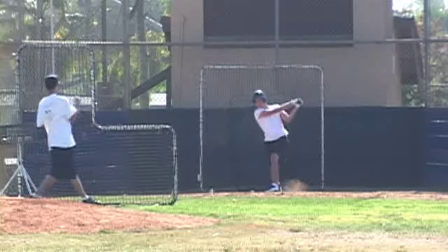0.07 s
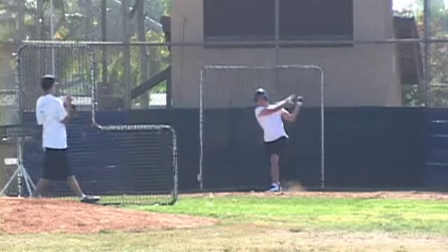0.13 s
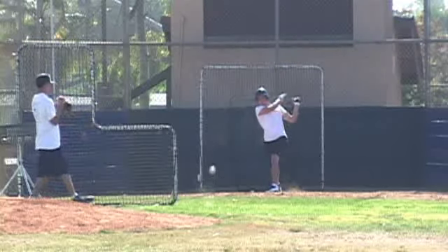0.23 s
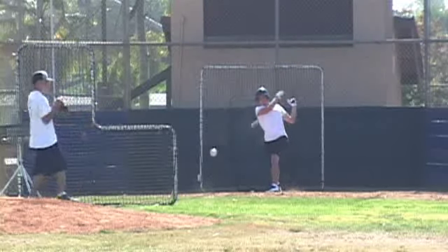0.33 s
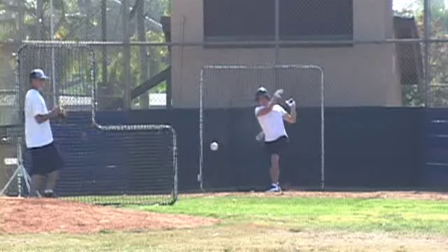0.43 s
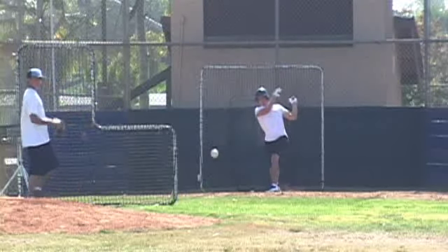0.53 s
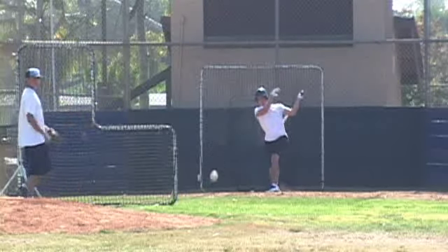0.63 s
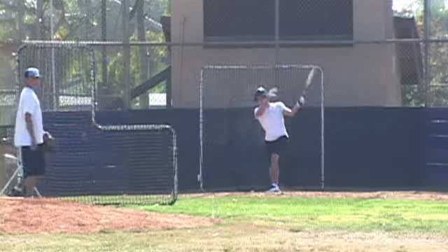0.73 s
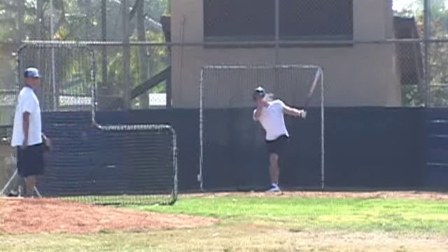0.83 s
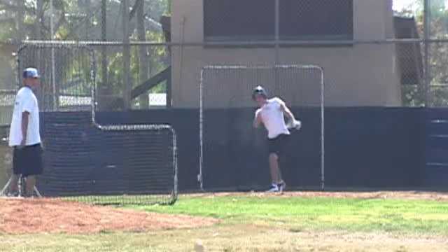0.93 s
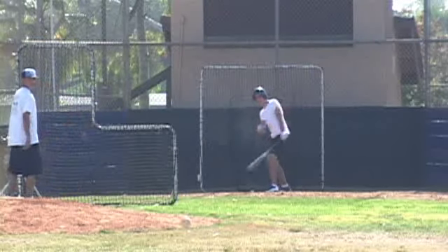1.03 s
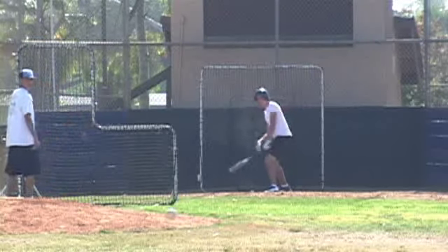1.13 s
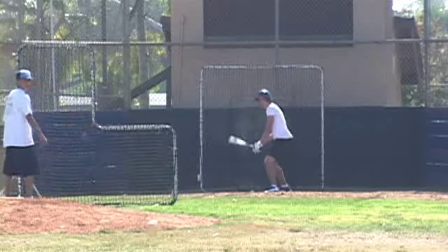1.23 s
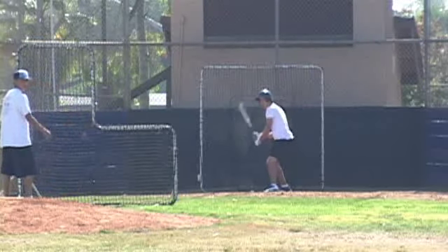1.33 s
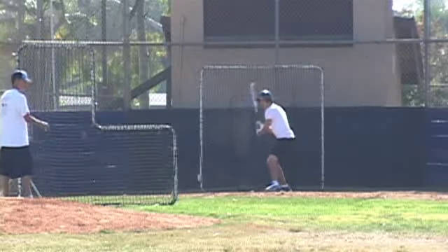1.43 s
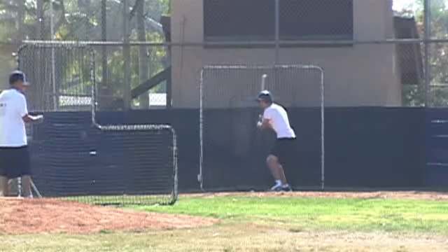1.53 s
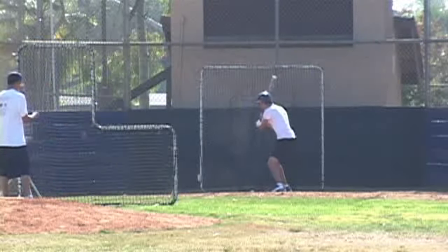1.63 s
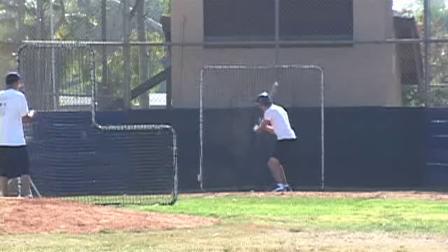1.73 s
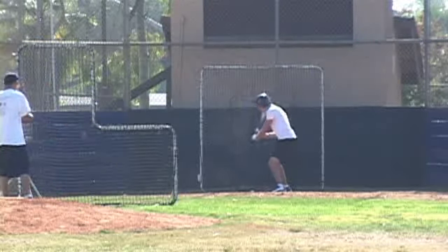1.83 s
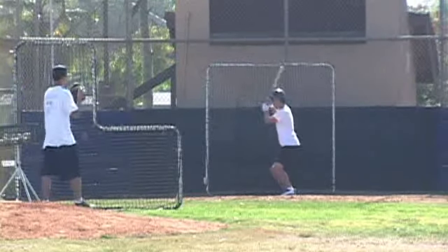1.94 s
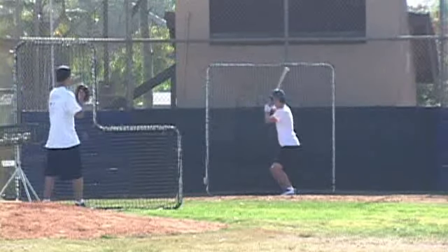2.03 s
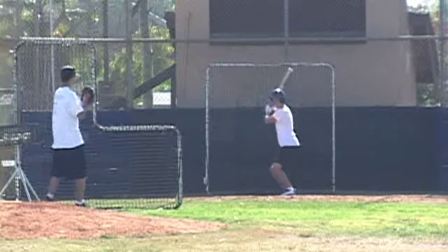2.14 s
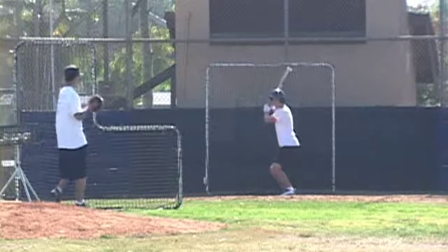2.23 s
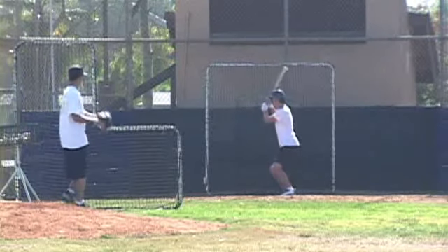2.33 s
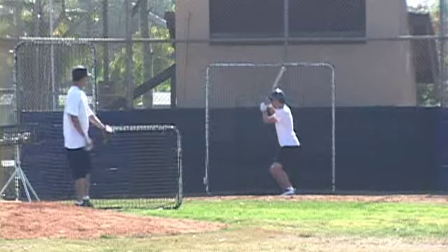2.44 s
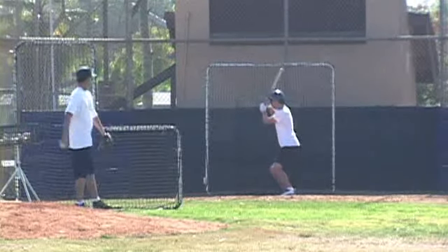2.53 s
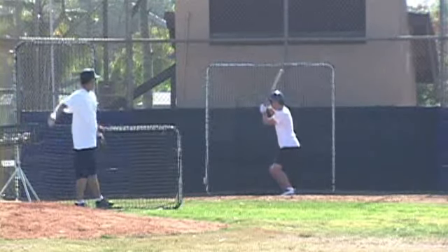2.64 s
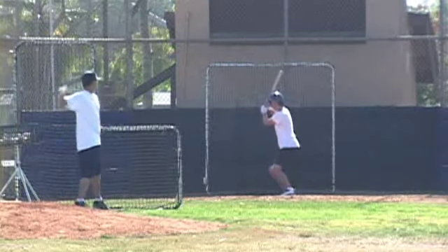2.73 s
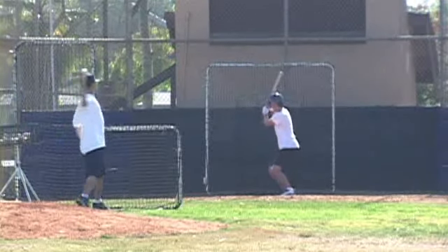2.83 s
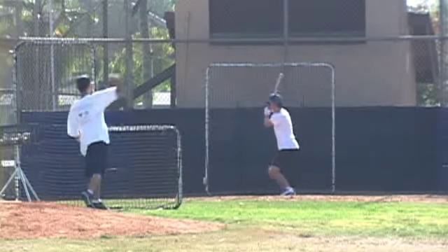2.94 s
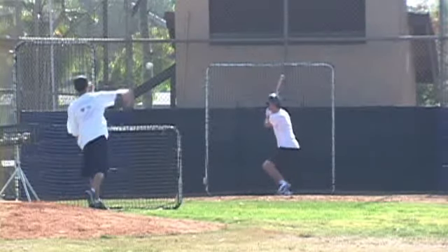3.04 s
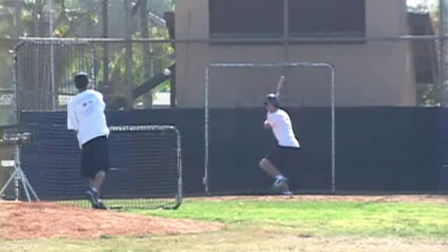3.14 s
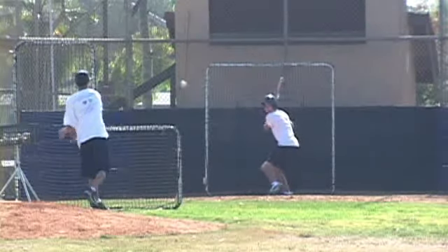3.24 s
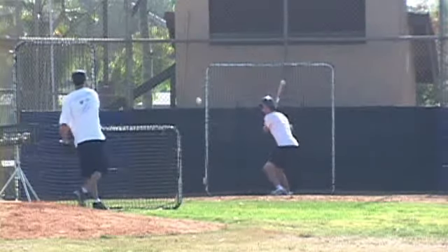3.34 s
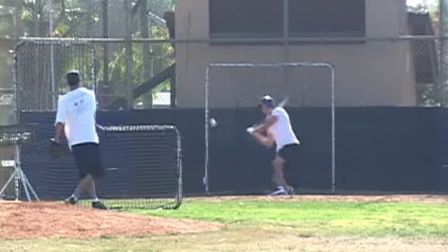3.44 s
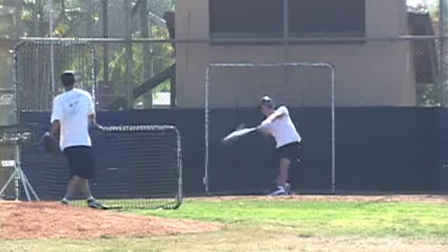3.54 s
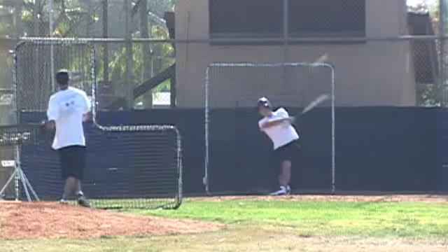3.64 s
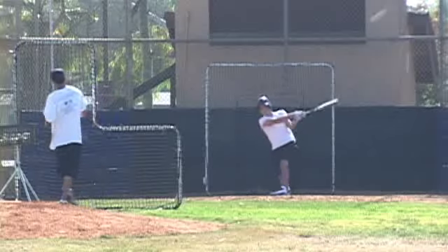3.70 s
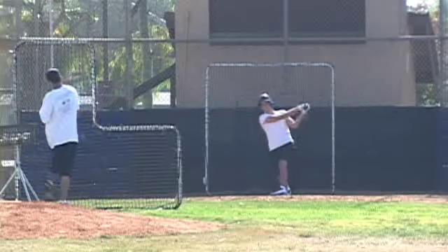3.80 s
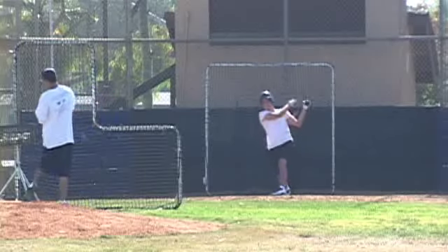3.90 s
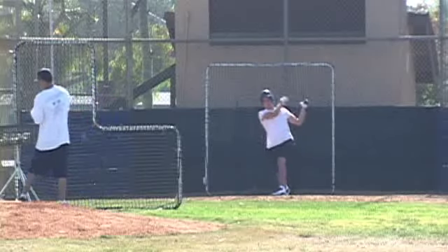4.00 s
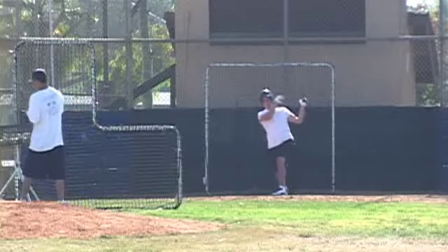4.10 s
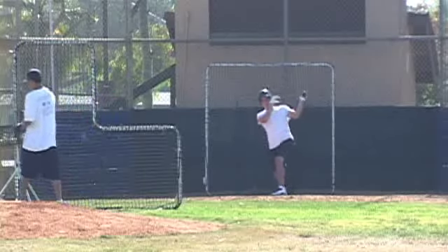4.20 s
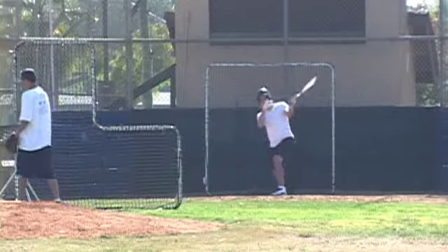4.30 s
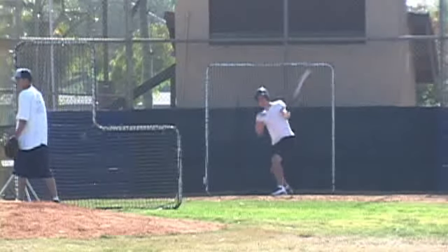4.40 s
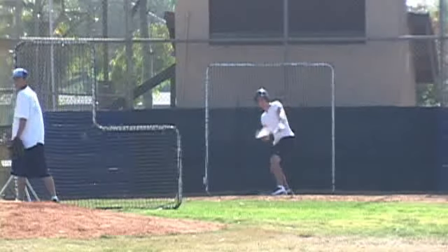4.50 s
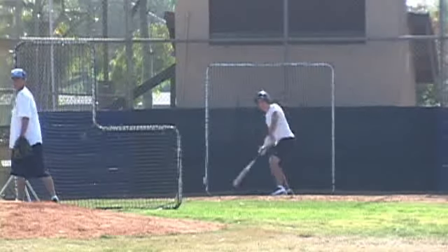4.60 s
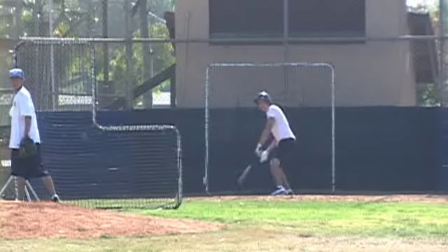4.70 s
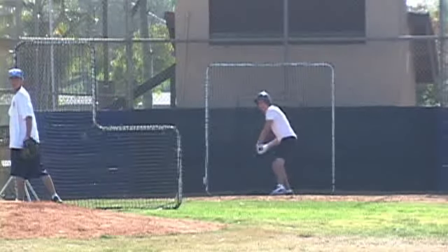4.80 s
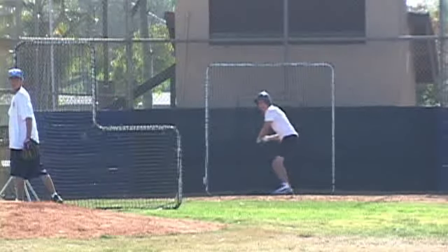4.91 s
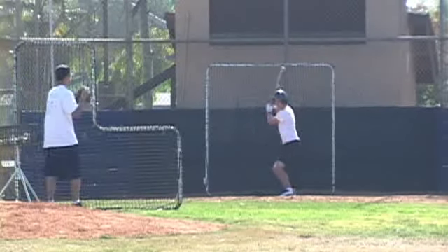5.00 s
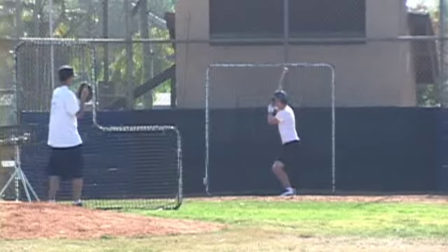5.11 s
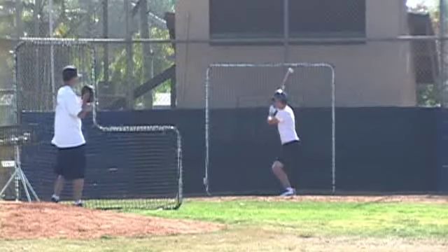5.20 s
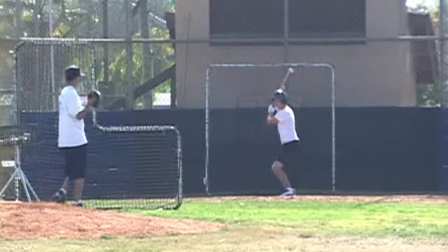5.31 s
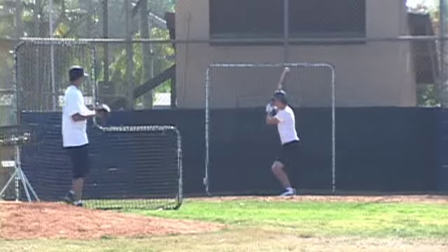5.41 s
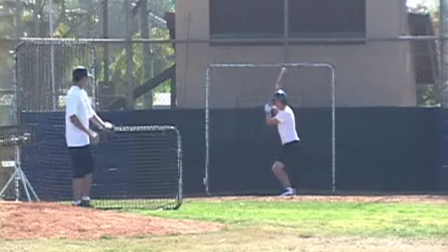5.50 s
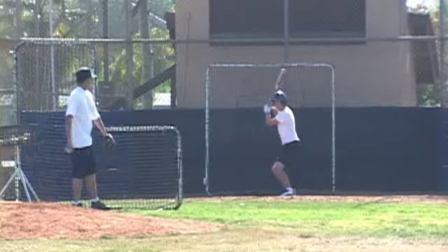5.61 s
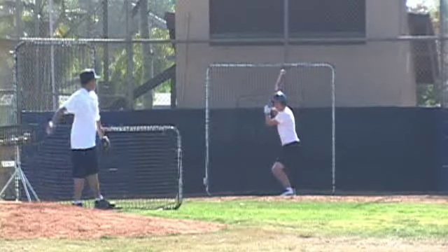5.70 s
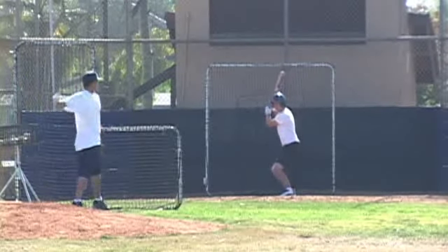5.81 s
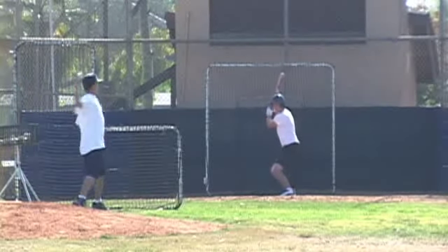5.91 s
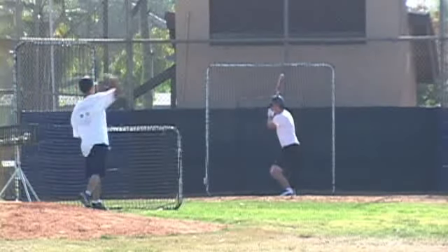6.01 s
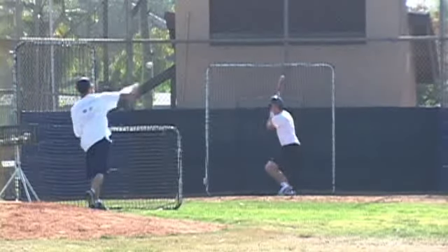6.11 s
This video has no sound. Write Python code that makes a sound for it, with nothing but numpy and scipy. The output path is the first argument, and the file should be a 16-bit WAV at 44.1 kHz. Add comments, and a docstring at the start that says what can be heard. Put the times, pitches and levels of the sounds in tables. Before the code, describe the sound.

A hollow metal bat pings hard twice at an open practice field, each ring swelling and bending, with a soft glove pop between.

```python
"""A sharp crack of a metal bat on a ball is heard first, and another later; each ring swells, bends and lingers.
Each blow is a noise burst with damped sines; the turning barrel adds gliding beams, long modes and a smeared band.
A wall and the field return delayed, coloured noise and ring. Between the hits a soft step and a ball in a glove
sound as damped modes. Faint birds are gliding sines with haze; a brief far tone is a wavering sine. Wind rumble,
far traffic and leaves are coloured noise over a sine hum; the low noise and hiss step up, sag and step back down."""
import sys
import numpy as np
from scipy import signal
from scipy.fft import irfft
from scipy.io import wavfile

SR = 44100
rng = np.random.default_rng(int(sys.argv[2]) if len(sys.argv) > 2 else 0)


def digitize_waveform(pressure):
    """Quantize a signal to 16-bit integers and store it at the path in sys.argv[1].

    Rows of a 2-D input are taken as channels; values are limited to [-1, 1].
    """
    field = np.atleast_2d(pressure).T
    bounded = np.clip(field, -1, 1)
    quanta = np.round(bounded * 32767).astype(np.int16)
    wavfile.write(sys.argv[1], SR, quanta)


N = 271215
TIME = np.arange(N) / SR   # s

# Bat meets ball: [t/s, crack level/dB, time until the barrel has turned away/s, time until it faces forward/s,
#   ping f/Hz, beam level/dB, lasting ring level/dB, ring tilt/(dB per octave), wall delay/s, wall level/dB]
HITS = [(0.0755, 6.5, 0.026, 0.13, 2076, -1.7, -4.5, 0, .0425, 1),
        (3.7822, 8, 0.026, 0.14, 2058, -3, -2.5, 0, .0452, -11)]
# Ping sent forward at contact, f as in the first hit: [f/Hz, first-hit level/dB, second-hit level/dB, t60/s]
PING = [(453, -12, -16, 0.016), (1026, -4.5, -23, 0.0084), (1300, -6, -43, 0.014), (2076, -2.5, -8, 0.6),
        (2570, -13, -6.5, 0.082), (3140, -0.5, -0.5, 0.014), (3630, -37, -6, 0.022),
        (4130, -20.5, -21, 0.11), (4460, -20.5, -13.5, 0.03), (5454, -17, -17.5, 0.088),
        (5915, -18.5, -24.5, 0.1), (6250, -29, -35, 0.046), (7050, -26, -25.5, 0.11)]
# Beams of the barrel modes; two equal beams lie offset before and after facing, and coincide at offset 0:
#   [f/Hz, level/dB, glide/(Hz/s), offset/swing time, half-width/swing time]
BEAMS = [(1915, -4.5, 61.5, 0.037, 0.18), (2093, -14, -330, 0.28, 0.16), (4170, -41.5, -600, 0.18, 0.26),
         (5000, -49, 3.5, 0, .22), (5430, -45, 1.5, .27, .09)]
# Weaker beam ahead of the first mode's beam: [centre/swing time, half-width/swing time, level/dB]
SIDE_BEAM = (0.44, 0.6, -15.5)
# Lasting modes of the hollow barrel: [f/Hz, level/dB, t60/s]
BARREL_MODES = [(1886, -27, 1.87), (1995, -24.5, 1.8), (2097, -24.5, 1.82), (2380, -35.5, 1),
                (3800, -41.5, 0.84), (4200, -41.5, 0.74), (4910, -36, 0.96), (5470, -41, 0.58),
                (5950, -41.5, 0.32)]
# Two main modes smeared into one band by the bat's motion: [f/Hz, level/dB]
SMEAR_COLOUR = [(1790, -51.5), (1855, -16.5), (1897, 4.5), (1950, -10.5), (2020, 0), (2080, 7.5),
                (2130, -20), (2190, -44.5)]
# Swells of the lingering ring: [t after the hit/s, half-width/s, level/dB]
RING_SWELLS = [(.24, .06, 9.5), (0.562, .07, 9.5), (.72, .06, 8), (.855, 0.025, 12)]
# Colour of the crack: [f/Hz, level/dB]
CRACK_COLOUR = [(150, -7), (300, -14), (700, -30), (1400, -10.5), (2300, 14), (3200, -2), (4500, -2.5),
                (6000, -19), (7500, -18.5)]
# Colour of the slap returned by the wall: [f/Hz, level/dB]
WALL_COLOUR = [(150, -23), (300, 4.5), (800, -4.5), (1400, -2), (1780, 12), (2300, -5.5), (3200, 2),
               (4200, -8.5), (5500, -15.5), (7500, -27.5)]
# Ring sent backward to the wall: [f/Hz, level/dB, t60/s]
BACK_RING = [(946, -10, 0.017), (1797, 3.5, 0.018), (1870, -7.5, 0.14), (2410, -18, 0.093),
             (2996, -6, 0.025), (5000, -23, .06), (5540, -24.5, 0.055)]
# Colour of scatter from fences and trees: [f/Hz, level/dB]
SCATTER_COLOUR = [(150, -10), (400, -17.5), (1200, 2), (2200, 1), (3000, 4), (4300, -7.5), (5800, -4),
                  (7500, -21)]
# Farther echoes of the crack: [delay/s, half-width/s, level/dB, low f/Hz, high f/Hz]
ECHOES = [(0.103, 0.0045, -30.5, 2810, 5930), (0.297, .003, -29, 4960, 7400)]
# Ball into leather: [t/s, level/dB]
CATCHES = [(1.6726, -18)]
# Modes of the glove: [f/Hz, level/dB, t60/s]
GLOVE_MODES = [(378, -15, 0.045), (627, 1.5, 0.013), (1490, 2, 0.0031), (2060, -12.5, 0.0082),
               (2470, -17, 0.021), (6120, -16, 0.0023)]
# Soft footfalls on dirt: [t/s, level/dB, f/Hz, t60/s]
STEPS = [(1.016, -27.5, 288, 0.038)]
# Bird chirps: [t/s, half-width/s, f/Hz, glide/(Hz/s), level/dB]
CHIRPS = [(2.507, 0.0055, 5700, -1, -55), (2.81, 0.012, 4200, 4, -45), (3.2, 0.0095, 5900, 0, -59),
          (4.975, 0.012, 6100, -20000, -60), (5.783, 0.0092, 5200, 14996, -52),
          (5.781, 0.0065, 6400, -4, -59), (5.935, .018, 3600, 14999, -56)]
# Colour of the low noise that steps up for a while: [f/Hz, level/dB]
RAISED_COLOUR = [(55, -7), (80, 0), (120, 2), (165, -7.5), (220, -15), (300, -23)]
# Colour of the wind rumble: [f/Hz, level/dB]
RUMBLE_COLOUR = [(12, -61), (20, -29), (32, -10.5), (54, 0), (108, -0.5), (130, -3), (242, -16.5),
                 (300, -29.5), (390, -52), (660, -120)]
# One gust lifting the rumble: [t/s, half-width/s, level/dB]
GUST = (3.87, 0.67, 4.1)
# Colour of far traffic: [f/Hz, level/dB]
TRAFFIC_COLOUR = [(130, -23.5), (220, -5), (403, -5.5), (527, -7.5), (570, -7.5), (798, -6), (1130, -9),
                  (1340, -13.5), (2240, -18.5), (3200, -31.5), (4160, -59.5), (7040, -120)]
# Colour of leaves: [f/Hz, level/dB]
LEAVES_COLOUR = [(1500, -21.5), (2600, 2), (4000, -0.5), (6000, -4.5), (7500, -9)]

SMEAR_DB, SMEAR_T60_S, SMEAR_BUILD_S = -32, 1.72, 0.04
RAISED_ON_S, RAISED_OFF_S, RAISED_EDGE_S = 1.95, 5.1, 0.02
RAISED_DB, RAISED_SAG_DB_PER_S, RAISED_HISS_DB = -32, 0.5, -64
RUMBLE_DB, TRAFFIC_DB, LEAVES_DB = -36.5, -44, -62.5
RUMBLE_FALL_DB_PER_S = 0.06   # the wind slowly eases
CUTOFF_HZ = 7500


def from_db(db):
    """Level to amplitude: 20 dB is a factor of ten."""
    return 10 ** (np.asarray(db) / 20)


def rms_one(x):
    """Normalisation: scale to unit rms."""
    return x / np.sqrt(np.mean(x ** 2) + 1e-20)


def noise(spectrum, size=N):
    """Random-phase synthesis: a fixed magnitude spectrum gives coloured noise of unit rms."""
    hz, db = np.transpose(spectrum)
    octave = np.log2(np.maximum(np.fft.rfftfreq(size, 1 / SR), 1))
    outside = np.abs(octave - np.clip(octave, np.log2(hz[0]), np.log2(hz[-1])))
    # 22 dB per octave is taken off beyond the ends of the table
    gain = from_db(np.interp(octave, np.log2(hz), db) - 22 * outside)
    phase = 2 * np.pi * rng.random(len(gain))
    return rms_one(irfft(gain * np.exp(1j * phase), size))


def drift(rate):
    """Low-passed chance: two equal poles smooth white noise into a wander of unit rms."""
    step = 100   # samples between drawn values
    pole = np.exp(-2 * np.pi * rate * step / SR)
    white = rng.standard_normal(N // step + 1002)
    slow = signal.lfilter([1], [1, -2 * pole, pole * pole], white)[1000:]   # drop the filter's start
    return np.interp(np.arange(N) / step, np.arange(len(slow)), rms_one(slow))


def decay(start, t60):
    """Exponential damping: a sudden start, then 60 dB lost in each t60."""
    return (TIME >= start) * from_db(-60 * np.clip((TIME - start) / t60, 0, 4))


def mode(start, hz, t60):
    """Free vibration of a struck mode: a damped sine."""
    return decay(start, t60) * np.sin(2 * np.pi * hz * (TIME - start))


def swell(centre, width):
    """Gaussian envelope: a smooth rise and fall, 1/e high at one half-width."""
    return np.exp(-np.minimum(((TIME - centre) / width) ** 2, 20))


def band(x, low_hz, high_hz):
    """Causal band-pass filtering."""
    return signal.sosfilt(signal.butter(2, [low_hz, high_hz], "band", fs=SR, output="sos"), x)


def contact(crack_db=-4, crack_t60=0.0079):
    """Impact excitation: a broad crack and a loud modal ping that fades as the barrel turns away."""
    crack = noise(CRACK_COLOUR)
    out = np.zeros(N)
    for k, (s, db, turn_s, _, pitch_hz, *_) in enumerate(HITS):
        ratio = pitch_hz / HITS[0][4]
        ping = np.zeros(N)
        for hz, *levels_db, t60 in PING:
            ping += from_db(levels_db[k]) * mode(s, hz * ratio, t60)
        out += from_db(crack_db + db) * crack * decay(s, crack_t60)
        out -= ping * swell(s, turn_s)
    return out


def sweeping_beams(octave_db=-26):
    """Directivity of a turning radiator: beams sweep past, later and wider in a slower swing."""
    side_at, side_width, side_db = SIDE_BEAM
    out = np.zeros(N)
    for s, _, _, swing_s, pitch_hz, beam_db, *_ in HITS:
        facing = s + swing_s
        since_facing = TIME - facing
        for k, (hz, db, glide, offset, width) in enumerate(BEAMS):
            early = swell(facing - offset * swing_s, width * swing_s)
            late = swell(facing + offset * swing_s, width * swing_s)
            beam = np.maximum(early, late)
            if k == 0:
                beam = beam + from_db(side_db) * swell(s + side_at * swing_s, side_width * swing_s)
            else:
                hz = hz * pitch_hz / HITS[0][4]   # the upper modes follow the pitch of the ping
            level = from_db(db + beam_db) * beam * (TIME >= s)
            phase = 2 * np.pi * (hz + glide * since_facing / 2) * since_facing
            out += level * np.sin(phase)
            # a faint octave grows as the square of the beam
            out += from_db(octave_db) * level ** 2 * np.sin(2 * phase)
    return out


def barrel_ring(slowing_s=0.822, build_s=0.008, count=4):
    """Doppler effect over several paths: each path bends and flutters the lasting modes in its own way."""
    doppler, flutter_db = 0.014, 3.2   # rms relative shift at the blow; rms flutter
    out = np.zeros(N)
    for s, *_, ring_db, tilt_db, _, _ in HITS:
        live = (TIME >= s) & (TIME < s + 2)
        age = TIME[live] - s
        for path in range(count):
            # the shift shrinks as the bat slows
            shift = doppler * np.exp(-age / slowing_s) * drift(3.85)[live]
            clock = age + np.cumsum(shift) / SR
            strength = from_db(ring_db + flutter_db * drift(13)[live]) * (1 - np.exp(-age / build_s))
            for hz, db, t60 in BARREL_MODES:
                tilted_db = db + tilt_db * np.log2(hz / BARREL_MODES[0][0])
                level = strength * from_db(tilted_db) * np.exp(-np.log(1000) * age / t60)
                out[live] += level * np.sin(2 * np.pi * (hz * clock + rng.random()))
    return out / np.sqrt(count)


def lingering_ring():
    """Scattering among the fences: a smeared band of ring builds, then dies away in slow swells."""
    out = np.zeros(N)
    for s, _, _, swing_s, _, _, ring_db, *_ in HITS:
        facing = s + swing_s
        build = 1 - np.exp(-np.maximum(TIME - facing, 0) / SMEAR_BUILD_S)
        swell_db = sum(db * swell(s + age, width) for age, width, db in RING_SWELLS)
        out += from_db(SMEAR_DB + ring_db + swell_db) * build * decay(facing, SMEAR_T60_S)
    return out * noise(SMEAR_COLOUR)


def wall_echo(slap_db=-11, smear_t60=0.045):
    """Reflection from the building behind: a slap smeared by its ledges, with the backward ring."""
    soften_s = 0.0018
    slap = noise(WALL_COLOUR)
    out = np.zeros(N)
    for s, *_, delay, echo_db in HITS:
        arrival = s + delay
        onset = 1 - np.exp(-np.maximum(TIME - arrival, 0) / soften_s)
        ring = sum(from_db(db) * mode(arrival, hz, t60) for hz, db, t60 in BACK_RING)
        smeared_slap = from_db(slap_db) * slap * decay(arrival, smear_t60)
        out += from_db(echo_db) * onset * (ring + smeared_slap)
    return out


def field(scatter_db=-31, scatter_t60=0.76):
    """Diffuse scattering: an uneven tail that takes a moment to build, with distinct far echoes."""
    uneven_db, build_t60 = 2.2, 0.06   # dB rms; s
    tail = sum(decay(s, scatter_t60) - decay(s, build_t60) for s, *_ in HITS)
    out = from_db(scatter_db + uneven_db * drift(130)) * noise(SCATTER_COLOUR) * tail
    crack = noise(CRACK_COLOUR)
    for delay, width, db, low_hz, high_hz in ECHOES:
        arrivals = sum(swell(s + delay, width) for s, *_ in HITS)
        out += from_db(db) * band(crack, low_hz, high_hz) * arrivals
    return out


def glove():
    """Heavy damping: a dry leather slap of a few short modes."""
    out = np.zeros(N)
    for s, db in CATCHES:
        for hz, mode_db, t60 in GLOVE_MODES:
            out -= from_db(db + mode_db) * mode(s, hz, t60)
    return out


def steps():
    """Damped impact: a shoe lands with a dull single-mode thud."""
    return sum(from_db(db) * mode(s, hz, t60) for s, db, hz, t60 in STEPS)


def birds(scatter_db=-11, scatter_t60=0.18, scatter_share=0.13):
    """Frequency and amplitude modulation: raspy gliding chirps, each with a haze scattered by the trees."""
    out = np.zeros(N)
    rasp = 0.7 + 0.7 * drift(900)
    white = rng.standard_normal(N)
    for s, width, hz, glide, db in CHIRPS:
        pitch = hz + glide * np.clip(TIME - s, -2 * width, 2 * width)
        out += from_db(db) * swell(s, width) * rasp * np.sin(2 * np.pi * np.cumsum(pitch) / SR)
        haze = rms_one(band(white, hz * (1 - scatter_share), hz * (1 + scatter_share)))
        out += from_db(db + scatter_db) * haze * decay(s - width / 2, scatter_t60)
    return out


def far_tone():
    """Slight frequency modulation: a faint, nearly steady tone surfaces briefly in the distance."""
    centre_s, width_s, hz, db = 2.13, 0.17, 529, -49
    pitch = hz + 3 * drift(5.0)
    return from_db(db) * swell(centre_s, width_s) * np.sin(2 * np.pi * np.cumsum(pitch) / SR)


def raised_noise():
    """Gated noise: the low background noise and hiss step up abruptly, sag a little and step back down."""
    gate = np.clip(np.minimum(TIME - RAISED_ON_S, RAISED_OFF_S - TIME) / RAISED_EDGE_S, 0, 1)
    level = gate * from_db(-RAISED_SAG_DB_PER_S * (TIME - RAISED_ON_S))
    hiss = from_db(RAISED_HISS_DB) * noise(LEAVES_COLOUR)
    return level * (from_db(RAISED_DB) * noise(RAISED_COLOUR) + hiss)


def background(hum_hz=70.3, hum_db=-43):
    """Superposed ambient sources: easing wind rumble with one gust, a faint hum, far traffic and leaves."""
    gust_s, gust_width_s, gust_db = GUST
    easing_db = -RUMBLE_FALL_DB_PER_S * (TIME - TIME.mean())
    rumble_db = RUMBLE_DB + easing_db + gust_db * swell(gust_s, gust_width_s)
    rumble = from_db(rumble_db) * noise(RUMBLE_COLOUR)
    hum = from_db(hum_db) * np.sin(2 * np.pi * np.cumsum(hum_hz + drift(2.1)) / SR)
    traffic = from_db(TRAFFIC_DB) * noise(TRAFFIC_COLOUR)
    leaves = from_db(LEAVES_DB) * noise(LEAVES_COLOUR)
    return rumble + hum + traffic + leaves


def lean(x, right_db):
    """Interaural level difference: the right channel is made louder than the left."""
    return x * from_db([[-right_db / 2], [right_db / 2]])


def scene():
    """Superposition of all layers in two channels: the blows, beams, wall echo and field stay centred; all else
    lies slightly to the right."""
    blows = contact() + sweeping_beams() + wall_echo() + field()
    others = barrel_ring() + lingering_ring() + glove() + steps()
    others = others + birds() + far_tone() + raised_noise() + background()
    return blows + lean(others, right_db=1.45)


def record(dry, ceiling=0.91):
    """Saturation and low-pass filtering: the cracks overload the microphone; the top is cut steeply."""
    clipped = dry / (1 + (dry / ceiling) ** 6) ** (1 / 6)
    low_pass = signal.ellip(10, 0.3, 70, CUTOFF_HZ, fs=SR, output="sos")   # ripple 0.3 dB, stop band 70 dB
    return signal.sosfilt(low_pass, clipped)


dry = scene()
out = record(dry)
digitize_waveform(out)
```